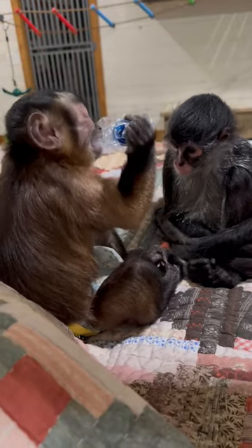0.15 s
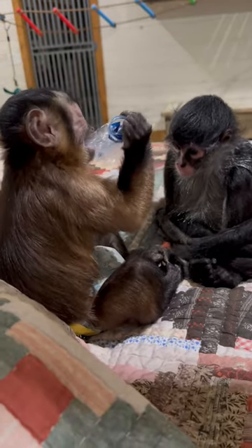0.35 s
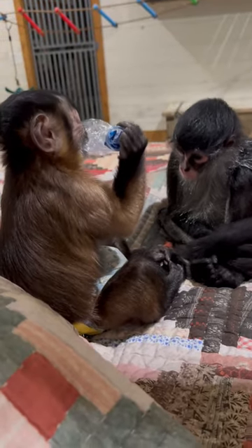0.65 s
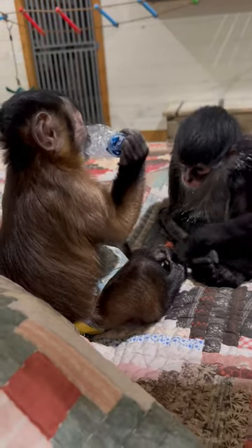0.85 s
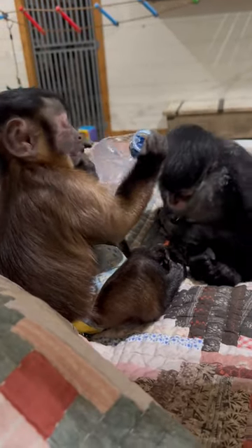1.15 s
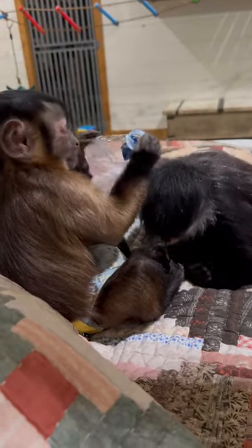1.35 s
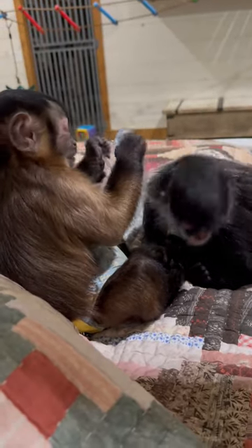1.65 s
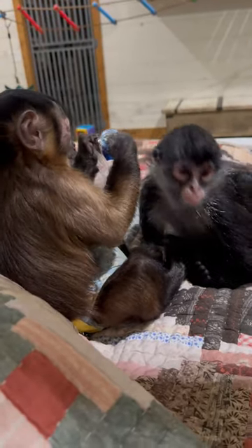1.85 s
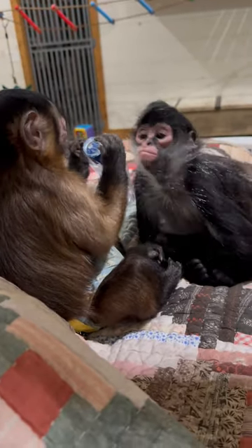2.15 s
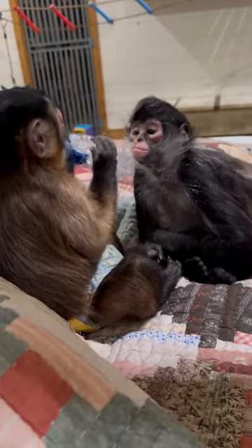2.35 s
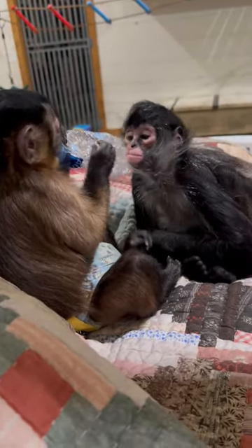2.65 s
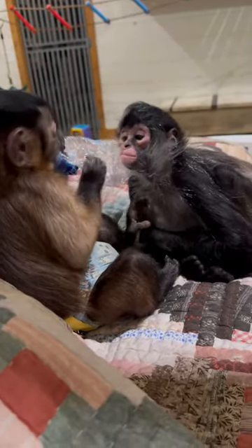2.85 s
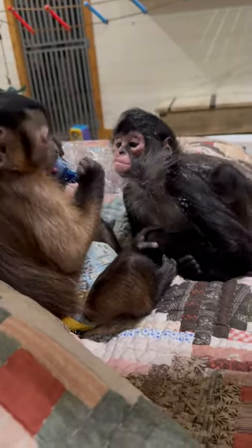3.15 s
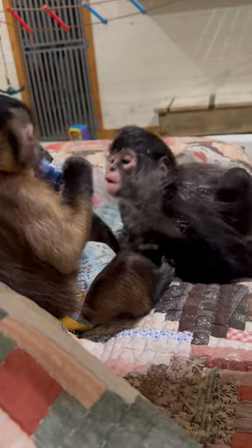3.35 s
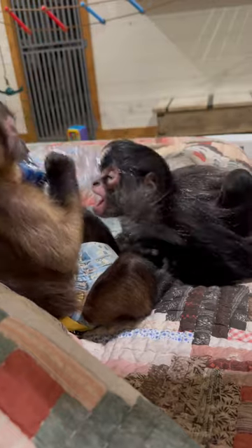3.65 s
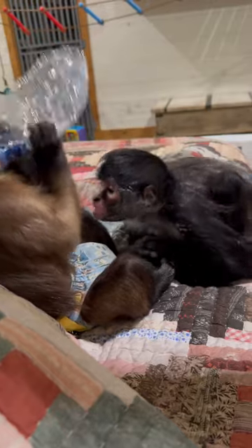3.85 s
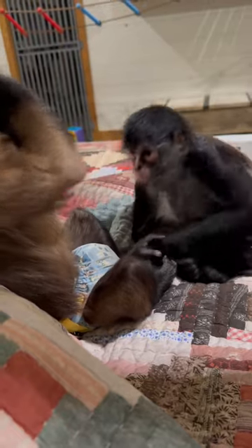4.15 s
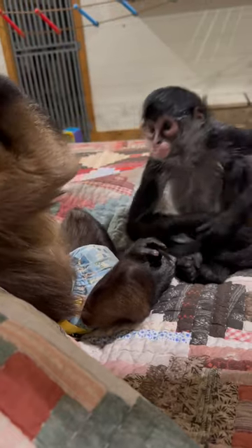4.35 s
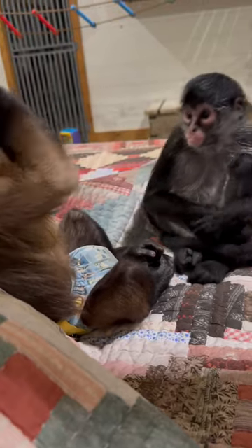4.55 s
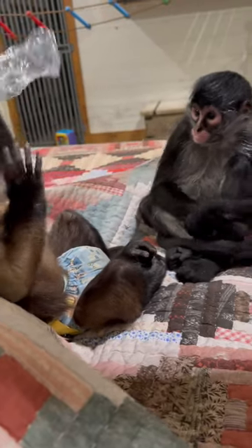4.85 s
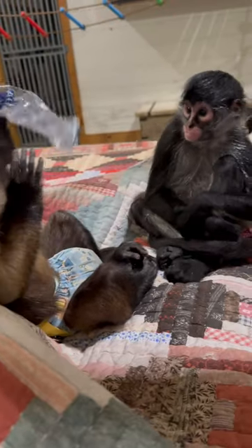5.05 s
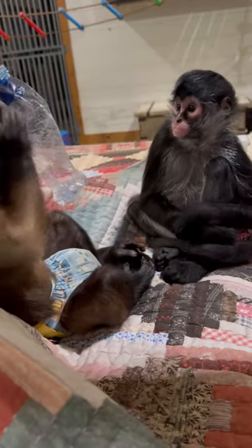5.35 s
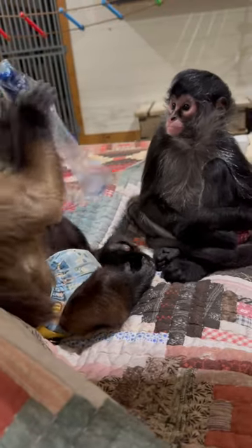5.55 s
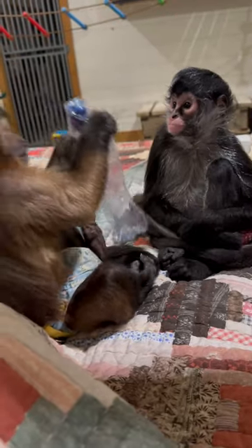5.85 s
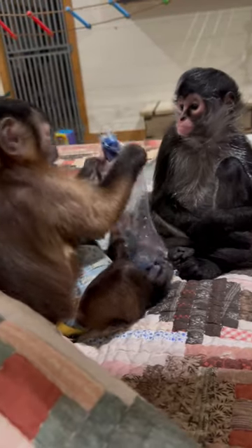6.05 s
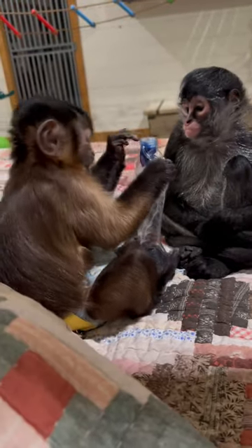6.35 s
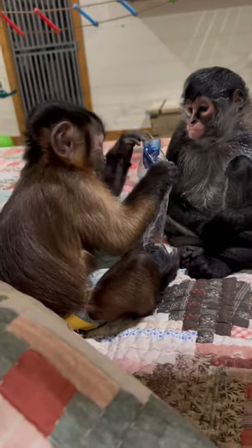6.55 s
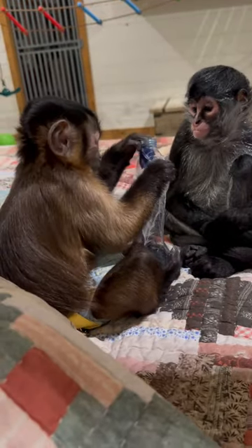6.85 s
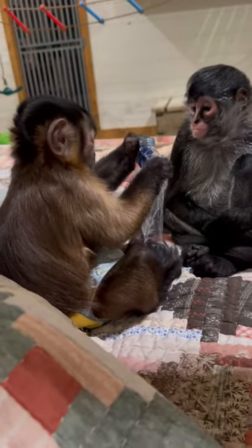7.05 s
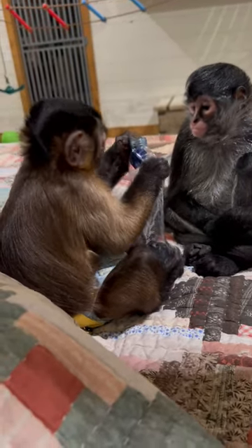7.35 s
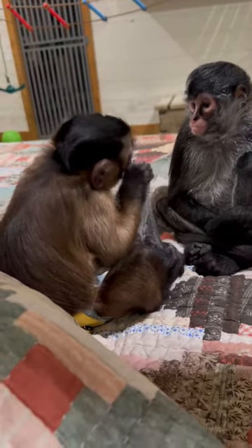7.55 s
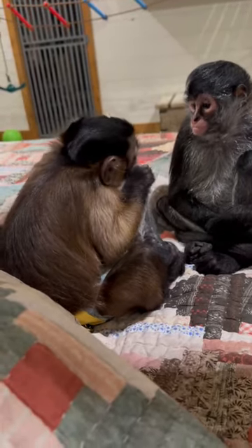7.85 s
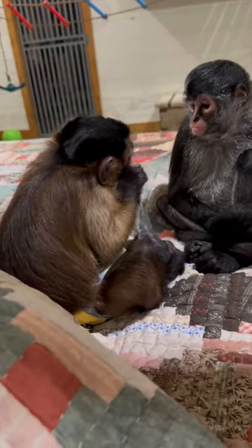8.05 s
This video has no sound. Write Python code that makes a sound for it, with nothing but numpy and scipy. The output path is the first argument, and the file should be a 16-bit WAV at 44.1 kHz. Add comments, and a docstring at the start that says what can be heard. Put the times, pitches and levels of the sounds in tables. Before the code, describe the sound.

A monkey crunches a crumpled plastic bottle close by, sharp irregular snaps then softer crinkles, with tiny chirps and a faint household hum.

```python
"""Monkey chewing a plastic bottle

A monkey on a quilted bed bites and turns a crumpled bottle close to a phone's two ports, in a bare room.
Creases snap and ring modes of the thin wall; runs of tiny ticks make the crinkling and the rustle of cloth.
A monkey chirps in short bending notes and coos softly, both from swept sines. Filtered noise tails
let the walls answer, over the wavering lines of a household machine, room air and an early low rumble."""
import sys
import numpy as np
from scipy import signal
from scipy.fft import rfft, irfft, next_fast_len
from scipy.io import wavfile
from scipy.ndimage import uniform_filter1d

SR = 44100
rng = np.random.default_rng(int(sys.argv[2]) if len(sys.argv) > 2 else 0)


def master_out(mix):
    """Clip the mix to full scale and print it as 16-bit PCM to the path in sys.argv[1]."""
    frames = np.transpose(np.atleast_2d(mix))
    ceiling = np.clip(frames, -1, 1)
    pcm = np.round(ceiling * 32767).astype(np.int16)
    wavfile.write(sys.argv[1], SR, pcm)


N = 361179

# resonances of the crinkling plastic: (frequency [Hz], level [dB])
FOLD_MODES = [(680, -4.5), (1190, -1.5), (1750, -3), (2080, 3), (2650, 3), (3500, -6)]


def undb(db):
    """Decibels to an amplitude factor."""
    return 10 ** (np.asarray(db) / 20)


def unit(x):
    """Scale to an rms of 1."""
    return x / np.sqrt(np.mean(x ** 2))


def along(table):
    """Columns of a time curve at every sample."""
    s, *columns = np.transpose(table)
    return [np.interp(np.arange(N) / SR, s, c) for c in columns]


def across(table, size):
    """A (frequency, value) curve on the bins of a transform of that size."""
    hz, value = np.transpose(table)
    bin_hz = np.arange(size // 2 + 1) * SR / size
    return np.interp(np.log(bin_hz + 1), np.log(hz + 1), value)


def band(x, lo_hz, hi_hz):
    """Keep one band of frequencies."""
    return signal.sosfilt(signal.butter(2, [lo_hz, hi_hz], "bandpass", fs=SR, output="sos"), x)


def walk(rate):
    """Random wander with an rms of 1, drawn anew `rate` times a second and smoothed."""
    k = int(SR / rate)
    steps = np.repeat(rng.standard_normal(N // k + 1), k)
    return unit(uniform_filter1d(uniform_filter1d(steps, k), k)[:N])


def gate(s, length, rise, fall):
    """Straight rise from time s and straight fall to the end, all in seconds."""
    t = np.arange(N) / SR
    return np.clip(np.minimum((t - s) / rise, (s + length - t) / fall), 0, 1)


def slips(rate, spread_db, hiss):
    """Tiny ticks of uneven size, on average `rate` a second, over a soft hiss."""
    strength = undb(spread_db * np.minimum(rng.exponential(size=N), 4))
    ticks = (rng.random(N) < rate / SR) * rng.standard_normal(N) * strength
    return unit(ticks) + hiss * rng.standard_normal(N) * undb(3 * walk(60))


def fold(drive):
    """Ticks ring each mode of a fold, and a treble band."""
    modes = [undb(db) * unit(band(drive, hz / 1.13, hz * 1.13)) for hz, db in FOLD_MODES]
    treble = band(band(drive, 2500.0, 6700.0), 2500.0, 6700.0)
    return np.array(modes), unit(treble)


def snaps():
    """A crease jumps and rings new wall modes each time; returns the near sound and what the walls receive."""
    # creases that snap, sharpness being the edge modes relative to the wall:
    # (time [s], wall peak [dB], strongest wall mode [Hz], sharpness [dB])
    creases = [(0.0649, -18, 2450, 8.5), (0.2214, -14, 2285, 5), (0.2286, -28, 1200, -4),
               (0.3782, -30, 1900, -11), (0.3944, -29.5, 1780, -6), (0.441, -21.5, 2570, 6.5),
               (0.4563, -10.5, 2220, 5.5), (0.4658, -18, 1110, -24), (0.47, -12, 2320, 2),
               (0.48, -19.5, 2430, 1), (0.6899, -21, 2970, 4), (0.6994, -33.5, 3300, 10),
               (0.731, -26.5, 2700, -18.5), (0.863, -23, 2580, 2.5), (0.9037, -14.5, 2290, -5),
               (0.9093, -11.5, 1790, 6), (0.9322, -11.5, 2100, 3), (1.1769, -37, 1900, -18),
               (1.402, -53.5, 2000, 0), (1.484, -55.5, 2370, -19.5), (1.5557, -50, 1664, 3.5),
               (1.579, -43.5, 2500, -13), (1.703, -52, 3650, 2), (1.825, -59, 1327, -15),
               (1.856, -62.5, 2920, 14.5), (1.938, -42, 1942, -25.5), (2.2073, -35.5, 2244, -15),
               (2.212, -38.5, 1580, -25.5), (2.2394, -35.5, 2050, -31.5), (2.575, -45.5, 876, -34),
               (2.8093, -31.5, 1598, -13), (2.836, -36.5, 2030, -13.5), (3.022, -45, 2460, -22),
               (3.14, -38, 1840, -8), (3.193, -45, 1896, -18), (3.26, -34, 2240, -12.5),
               (3.4144, -45, 1694, -14.5), (3.4434, -44.5, 1480, -12.5), (3.5614, -33, 2000, -16),
               (3.637, -38, 1700, -14.5), (3.813, -46.5, 1480, -15), (3.8312, -46, 1720, -24),
               (3.8866, -44.5, 1400, -12.5), (3.9107, -30, 1970, -11.5), (3.93, -37.5, 1950, -8),
               (3.96, -37, 1188, -11.5), (4.0705, -41, 1520, -23), (4.0887, -32.5, 1830, -6.5),
               (4.107, -47, 2180, -9), (4.216, -48, 2000, -9.5), (4.231, -40, 1723, -33.5),
               (4.4871, -37.5, 1780, -14), (4.532, -37, 1900, -6), (4.5524, -25, 1240, -9),
               (4.7211, -45.5, 1763, -1.5), (4.805, -53.5, 1653, -5.5), (4.998, -59.5, 1300, -0.5),
               (5.525, -51, 970, -16.5), (5.908, -41.5, 2240, -2), (5.9675, -34, 3360, -14.5),
               (5.9953, -45, 1057, -11), (6.0155, -38, 1100, -0.5), (6.0335, -37, 977, -8),
               (6.2085, -32.5, 1100, -12), (6.255, -39.5, 1110, -32), (6.2822, -45, 836, -27),
               (6.354, -35, 1373, -11.5), (6.374, -43.5, 1280, -40.5), (6.6224, -44, 940, 9),
               (6.638, -33.5, 2770, 1), (6.665, -41.5, 2010, -22), (6.71, -39, 2140, -6),
               (6.7778, -55, 2000, 13), (6.7931, -42.5, 2000, 14.5), (6.81, -35.5, 2040, 0),
               (6.8905, -38.5, 2610, -13), (6.908, -47, 2150, -24), (6.916, -44.5, 2470, 8.5),
               (6.923, -40, 2620, -0.5), (7.001, -48.5, 900, -3.5), (7.035, -51, 2220, 3),
               (7.2334, -51.5, 3530, -31.5), (7.292, -58.5, 2000, 6.5), (7.42, -44.5, 1630, -26),
               (7.4474, -40.5, 1520, -43), (7.591, -36.5, 1230, -37), (7.7724, -17, 2270, 2.5),
               (7.7834, -34, 3300, -11), (7.7981, -13, 2500, 9), (7.8961, -28, 1430, -9),
               (8.066, -33, 1920, -8.5), (8.108, -5.5, 2185, -0.5)]
    # thin ticks that ring the top modes alone, perhaps claws on the plastic: (time [s], peak [dB])
    claw_ticks = [(1.7016, -36), (4.5566, -38), (4.722, -46), (6.78, -12), (7.098, -46.5)]
    # crowds of modes, in the order wall, body, edge, top; the wall's own decay is set further down:
    # (from [Hz], to [Hz], t60 [s], rise at the upper limit [s])
    zones = [(900, 4000, .013, .0003), (400, 1300, .045, .0015), (4000, 9000, .008, .0002),
             (9300, 15600, .005, .0002)]
    # modes of the hollow body, kept through all crumpling: (frequency [Hz], level [dB])
    body_modes = [(440, -4), (560, -4), (720, -5), (890, -3), (1180, -1)]
    edge_hz = 6160  # strongest edge mode
    wall_t60_s = 0.013  # at 2 kHz
    top_db, top_knee_db, top_fade = -3, -5.5, 0.31  # relative to the edge; fade is dB per dB below the knee
    body_room_db = -4  # the body reaches the walls more weakly

    t = np.arange(2048) / SR
    direct, spread = np.zeros(N + 2048), np.zeros(N + 2048)
    clicks = [band(band(t == 0, lo / 1.2, hi * 1.2), lo / 1.2, hi * 1.2) for lo, hi, *_ in zones]

    blows = [(s, 3, db, None) for s, db in claw_ticks]  # (time [s], zone, peak [dB], strongest mode [Hz])
    for s, db, wall_hz, sharp_db in creases:
        # large creases ring low and move the body more
        body_db = -8.5 - 6.5 * np.log2(wall_hz / 1000)
        # the extreme treble falls away more quickly below a set sharpness
        top_rel_db = top_db + sharp_db - top_fade * max(top_knee_db - sharp_db, 0)
        blows += [(s, 0, db, wall_hz), (s, 1, db + body_db, None),
                  (s, 2, db + sharp_db, edge_hz), (s, 3, db + top_rel_db, None)]

    draws = rng.random((len(blows), 3, 12, 1))
    for (s, zone, db, centre), (place, turn, size) in zip(blows, draws):
        i, click = int(s * SR), clicks[zone]
        lo_hz, hi_hz, t60, rise = zones[zone]
        hz = lo_hz * (hi_hz / lo_hz) ** ((np.arange(12)[:, None] + place) / 12)
        size = .5 + size
        if centre:  # modes near the size of the crease take most of the blow
            own = np.abs(np.log(hz / centre)).argmin()
            hz[own], size[own] = centre, 1.6
            size = size * undb(-8.0 * np.abs(np.log2(hz / centre)))
            # large creases send little treble
            broad = 2.7 * min(centre / 3200.0, 1) ** 1.6 * click
            click = band(click, centre / 1.334, centre * 1.53) + broad
        if zone == 0:
            t60 = wall_t60_s * np.sqrt(2000 / hz)  # low modes ring longer
        if zone == 1:
            body_hz, mode_db = np.transpose(body_modes)[..., None]
            hz = body_hz * (1 + .05 * (place[:5] - .5))
            size, turn = size[:5] * undb(mode_db), turn[:5]
        swell = 1 - np.exp(-t / (rise * (hi_hz / hz) ** 0.55))  # low modes come late
        decay = np.exp(-np.log(1000) * t / t60)
        ring = (size * swell * np.sin(2 * np.pi * (hz * t + 0.6 * turn)) * decay).sum(0)
        ring *= undb(db) / np.abs(ring).max()
        direct[i:i + 2048] += ring
        # summed over all directions the single modes partly blur into one broad band
        blurred = unit(click) * np.std(ring) + 0.7 * ring
        spread[i:i + 2048] += blurred * undb(body_room_db * (zone == 1))
    return band(direct[:N], 380., 19000.), spread[:N]  # so small a wall radiates no bass


def crinkles():
    """Grainy crinkling from tiny ticks through resonances, and at the very start the fading tail of a crack."""
    # crinkling, the first row being the tail of a crack, treble relative to the level:
    # (time [s], length [s], level [dB], strongest mode [Hz], treble [dB])
    grains = [(0, 0.071, -46.5, 1760, 9), (0.124, 0.043, -47, 2090, -0.5), (0.37, 0.042, -49, 1620, -10),
              (0.797, 0.043, -49, 2750, -13), (1.828, 0.15, -71, 2000, -3), (2.84, 0.056, -53, 1670, -13.5),
              (3.11, 0.058, -58.5, 1530, -6.5), (3.268, 0.036, -54, 1670, -15),
              (3.305, 0.039, -51, 1410, -37), (4.075, 0.012, -61.5, 1540, -20),
              (5.523, 0.03, -58.5, 1188, -32), (5.586, 0.09, -71, 1508, -21),
              (6.13, 0.016, -57.5, 1320, -18), (6.18, 0.021, -59.5, 1200, -22),
              (6.284, 0.032, -56.5, 1300, -23), (6.558, 0.073, -54.5, 1490, -7),
              (6.681, 0.011, -66, 2000, 3), (6.77, 0.092, -61, 1870, 0), (7.548, 0.061, -53.5, 1700, -7.5),
              (7.614, 0.033, -47, 1410, -27.5), (7.65, 0.029, -53, 1500, -25),
              (7.737, 0.036, -59, 1470, -14.5), (7.961, 0.03, -50, 1880, -9),
              (8.034, 0.031, -49.5, 1400, -6)]
    focus_db_per_octave = -18  # modes far from the strongest are hardly driven
    modes, treble = fold(slips(rate=800, spread_db=1.5, hiss=.45))
    mode_hz = np.array(FOLD_MODES)[:, 0]
    out = np.zeros(N)
    for s, length, db, centre_hz, treble_db in grains:
        share = undb(focus_db_per_octave * np.abs(np.log2(mode_hz / centre_hz)))
        grain = unit(share @ modes) + undb(treble_db) * treble
        out += gate(s, length, 0.00055, 0.0054) * undb(db) * grain
    return out


def rattles():
    """A fold slips at a nearly even pace, each slip a click into its modes."""
    # short rattles, each slip's level varying at random around the one given:
    # (time [s], length [s], slip rate [1/s], level [dB])
    runs = [(7.455, 0.031, 190, -43), (7.506, 0.018, 170, -41.5)]
    drive, t = np.zeros(N), np.arange(512) / SR
    for s, length, rate, db in runs:
        times = s + np.arange(0, length, 1 / rate)
        times += .12 / rate * rng.standard_normal(len(times))
        drive[(times * SR).astype(int)] = undb(db + 2 * rng.standard_normal(len(times)))
    ring = sum(hz ** -0.8 * np.sin(2 * np.pi * hz * t) * np.exp(-t / 0.0015) for hz, _ in FOLD_MODES)
    return signal.fftconvolve(drive, ring / np.abs(ring).max())[:N]


def low_tones():
    """Low body tones, alone or under a snap, swell for a few ms and die."""
    # low tones: (time [s], approximate peak [dB], frequency [Hz])
    tones = [(1.128, -43.5, 274), (2.577, -48, 315), (2.809, -50.5, 333), (3.736, -50.5, 340),
             (4.557, -38, 470.5), (8.111, -23, 522)]
    t = np.arange(N) / SR
    out = np.zeros(N)
    for s, db, hz in tones:
        u = np.maximum(t - s, 0)
        swell = (1 - np.exp(-u / 0.0038)) * np.exp(-u / 0.0041)
        out += undb(db + 11.5) * swell * np.sin(2 * np.pi * hz * u)  # 11.5 dB make up for the slow swell
    return out


def rustle():
    """Paws and fur slide over cloth: finer, softer slips whose modes come and go as the folds shift."""
    # rustle, before the treble is added: (time [s], level [dB])
    sliding = [(0.0, -56.5), (1.0, -61), (1.39, -68), (2.03, -91), (2.78, -75.5), (3.19, -62),
               (5.29, -93.5), (5.95, -72), (6.11, -65), (6.95, -75), (7.44, -91), (7.64, -83),
               (8.03, -55.5), (8.19, -63)]
    modes, treble = fold(slips(rate=350, spread_db=2.6, hiss=.6))
    middle = sum(mode * undb(2.5 * walk(25)) for mode in modes)
    return undb(along(sliding)[0]) * (unit(middle) + undb(-14.0) * treble)


def faint_hiss():
    """Noise through narrow resonances swells slowly and stops quickly."""
    # the hiss: (time [s], length [s], level before its bands are summed [dB])
    s, length, db = (5.725, 0.13, -76)
    # its resonances: (frequency [Hz], relative level [dB])
    resonances = [(2200, -3), (3950, -1), (5700, 0)]
    hiss = sum(undb(d) * unit(band(rng.standard_normal(N), hz / 1.08, hz * 1.08)) for hz, d in resonances)
    return undb(db) * gate(s, length, 0.028, 0.012) * hiss


def chirps():
    """Short whistled notes whose pitch bends along a parabola; the overtones flutter."""
    # monkey chirps, octave and half-pitch relative to the note: (time [s], length [s], start pitch [Hz],
    # middle pitch [Hz], end pitch [Hz], level before the swell [dB], octave [dB], half-pitch [dB])
    notes = [(3.047, 0.043, 2540, 3170, 2570, -47, -17, -42.5),
             (3.121, 0.021, 3270, 3230, 2740, -43, -20, -44),
             (3.205, 0.032, 3100, 2870, 2480, -43.5, -16, -17),
             (4.405, 0.021, 6180, 6160, 5780, -66, -41, -44.5),
             (5.978, 0.016, 3730, 3350, 2950, -43.5, -13.5, -44.5),
             (6.099, 0.023, 3640, 3460, 3100, -36.5, -10, -43),
             (6.194, 0.013, 3280, 3090, 2780, -41, -12, -34.5)]
    out, flutter = np.zeros(N), undb(4 * walk(300))
    for s, length, start_hz, mid_hz, end_hz, db, octave_db, half_db in notes:
        i, u = int(s * SR), np.linspace(0, 1, int(length * SR))
        hz = np.polyval(np.polyfit([0, .5, 1], [start_hz, mid_hz, end_hz], 2), u)
        phase = 2 * np.pi * np.cumsum(hz) / SR
        swell = np.clip(np.minimum(u / 0.17, (1 - u) / 0.15), 0, 1) * (1 - 0.55 * u)
        hoarse = swell * flutter[i:i + len(u)]
        octave = undb(octave_db) * np.sin(2 * phase)
        half = undb(half_db) * (np.sin(phase / 2) + .5 * np.sin(3 * phase / 2))
        voice = undb(db) * (np.sin(phase) + hoarse * (octave + half))
        out[i:i + len(u)] += np.sqrt(2) * swell * voice
    return out


def coo():
    """A near-pure voice with soft ends, wavering in pitch and level."""
    # the soft coo, before its wavering: (time [s], pitch [Hz], level [dB])
    contour = [(1.47, 561, -75.5), (1.54, 639, -69.5), (1.581, 598, -70.5), (1.628, 639, -69.5),
               (1.697, 586, -69), (1.74, 540, -73)]
    hz, db = along(contour)
    t = np.arange(N) / SR
    ends = np.clip(np.minimum(t - contour[0][0], contour[-1][0] - t) / 0.021 + .5, 0, 1)
    phase = 2 * np.pi * np.cumsum(hz * (1 + 0.032 * walk(180))) / SR
    return ends * np.sqrt(2) * undb(db + 2.9 * walk(66)) * np.sin(phase)


def near(x):
    """A near source reaches the phone's two ports with a phase lead that changes with pitch."""
    # phase by which the left port leads: (frequency [Hz], lead [rad])
    port_lead = [(0, 0), (1000, .35), (4900, .4), (5700, -.6), (7000, -1.1), (9800, -2.6), (14800, -3.9),
                 (16600, -4.8)]
    size = next_fast_len(N + 4096)
    lead = np.exp(.5j * across(port_lead, size))
    return irfft(rfft(x, size) * np.array([lead, lead.conj()]), size)[:, :N]


def widen(noise):
    """Two unrelated noises become mid and side, in a balance chosen for each pitch."""
    # chosen side-to-mid balance of the tail and air, almost all side in the top treble:
    # (frequency [Hz], side minus mid [dB])
    width = [(60, -20), (200, -11), (700, -4), (1300, -12), (2400, -6), (4400, -3), (8800, -1), (9800, 40)]
    size = noise.shape[1]
    share = undb(across(width, size))
    weights = np.array([np.ones_like(share), share]) / np.sqrt(1 + share ** 2)
    mid, side = irfft(rfft(noise) * weights, size)
    return np.array([mid + side, mid - side])


def room(x):
    """Bare walls: after a short gap a dense tail that dies band by band."""
    # the walls' answer, level of the noise before its band filter: (frequency [Hz], level [dB], t60 [s])
    answer = [(227, -32, 0.83), (520, -32, 0.54), (975.4, -36, 0.24), (2000, -45, 0.63),
              (4440, -42.5, 0.62), (6550, -46, 0.59), (11300, -45.5, 0.49)]
    gap_s, rise_s = 0.0053, 0.0025
    t = np.arange(int(.8 * SR)) / SR
    tail = 0
    for hz, db, t60 in answer:
        noise = band(rng.standard_normal((2, len(t))), hz / 1.44, hz * 1.395)
        tail = tail + undb(db) * np.exp(-np.log(1000) * t / t60) * noise
    rise = np.clip((t - gap_s) / rise_s, 0, 1)
    rise = rise * undb(2.2 * walk(250)[:len(t)])  # clumps of echoes keep the tail grainy
    return signal.fftconvolve(x[None], widen(tail * rise), axes=1)[:, :N]


def background():
    """A household motor hums in wavering lines over the air of the room."""
    # lines of the hum, before their wavering: (frequency [Hz], level [dB])
    hum_lines = [(91.5, -69.5), (118.4, -64), (242.2, -76.5), (355.3, -70.5)]
    # shape of the air noise: (frequency [Hz], relative density [dB])
    air_shape = [(15, -42), (25, -10), (118, -5.5), (197, -17.5), (304, -15), (358, -21), (445, -30),
                 (1220, -44), (2150, -33), (6210, -43), (16500, -65.5)]
    air_db = -64  # the whole air noise in each channel
    t = np.arange(N) / SR
    hum = np.zeros(N)
    for hz, db in hum_lines:
        level = np.sqrt(2) * undb(db + 2.0 * walk(7.4))
        hum += level * np.sin(2 * np.pi * (hz * t + rng.random() + 0.24 * walk(8.7)))
    air = irfft(rfft(rng.standard_normal((2, N))) * undb(across(air_shape, N)), N)
    return hum + widen(unit(air)) * undb(air_db)


def rumble():
    """Low noise, perhaps the hand on the phone, that fades as the phone settles."""
    start_db, fade_s = -56, .4
    fade = np.exp(-np.arange(N) / SR / fade_s)
    return undb(start_db) * fade * unit(band(rng.standard_normal(N), 30., 220.))


def scene():
    """Near sounds at the two ports, the walls' answer to them, and the background."""
    direct, spread = snaps()
    soft = crinkles() + rattles() + faint_hiss() + rustle()
    calls, lows, moan = chirps(), low_tones(), coo()
    close = near(direct + soft + lows + calls + moan)
    # the chirping monkey faces away, so the walls carry more of it
    walls = room(spread + soft + undb(-18.0) * lows + undb(3) * calls + undb(-9) * moan)
    return close + walls + background() + rumble()


def record(dry):
    """The phone drops the deepest bass, rounds the loudest peaks and cuts the top."""
    top_hz = 16600
    dry = signal.sosfilt(signal.butter(2, 38., "highpass", fs=SR, output="sos"), dry)
    return signal.sosfilt(signal.ellip(10, .2, 80, top_hz, fs=SR, output="sos"), np.tanh(dry))


dry = scene()
out = record(dry)
master_out(out)
```